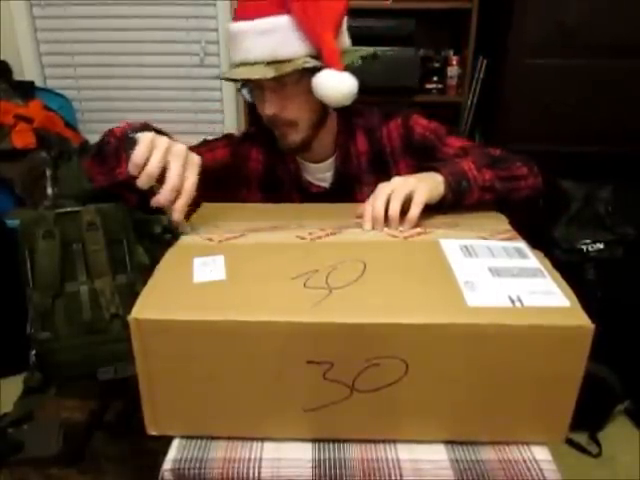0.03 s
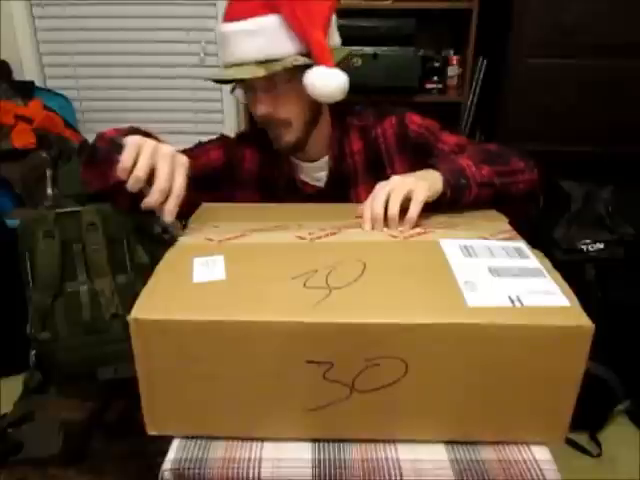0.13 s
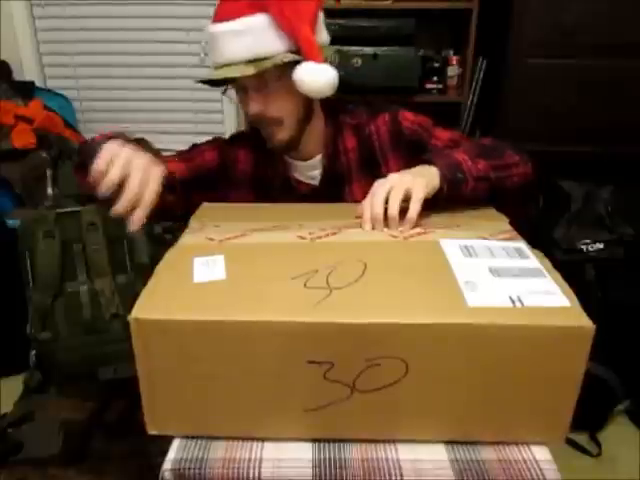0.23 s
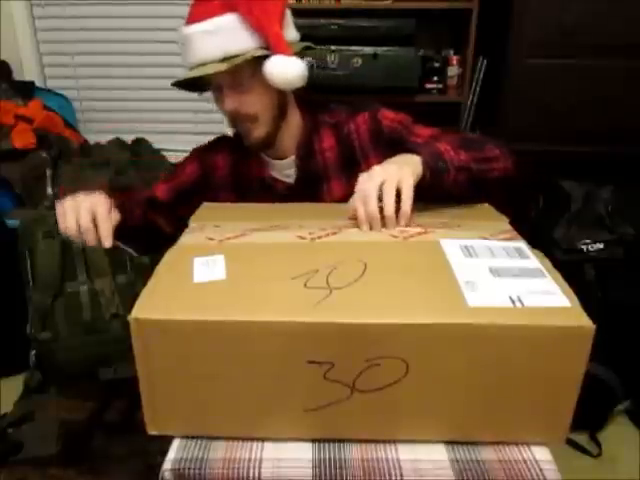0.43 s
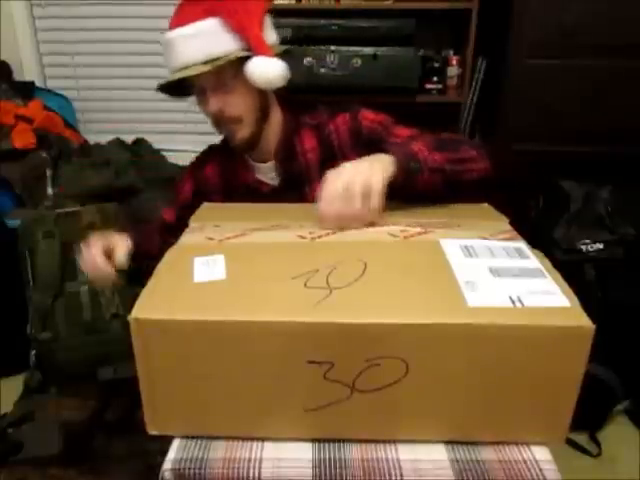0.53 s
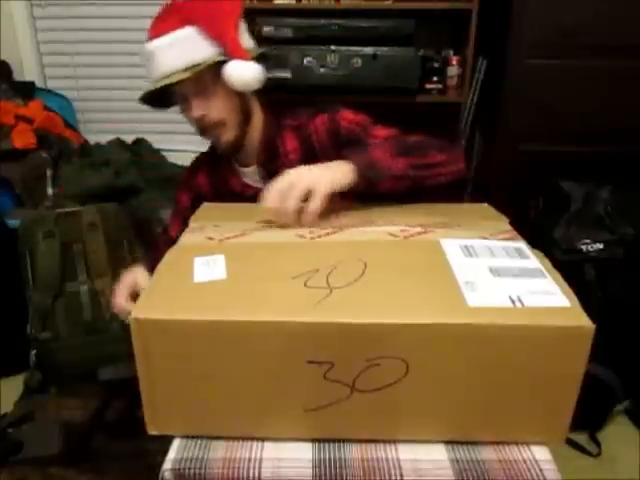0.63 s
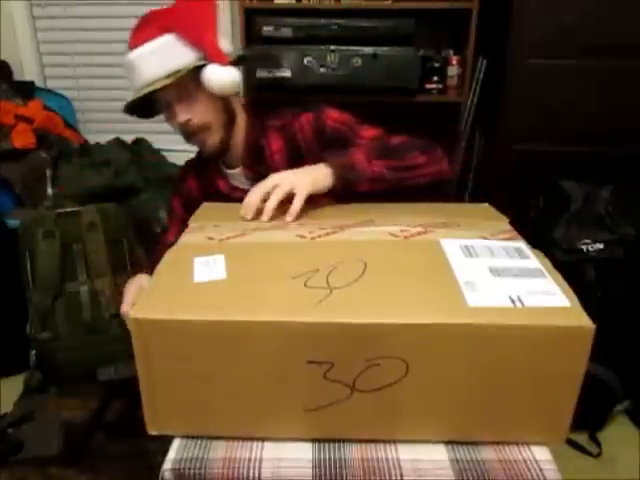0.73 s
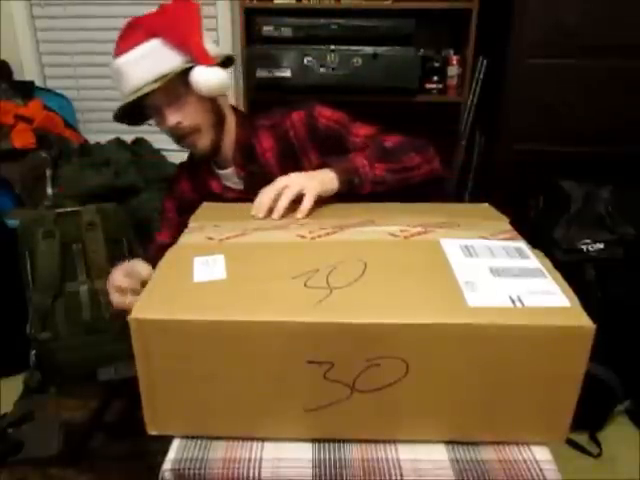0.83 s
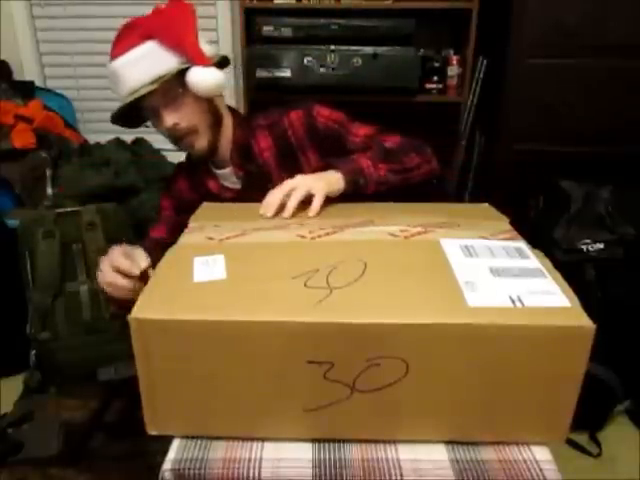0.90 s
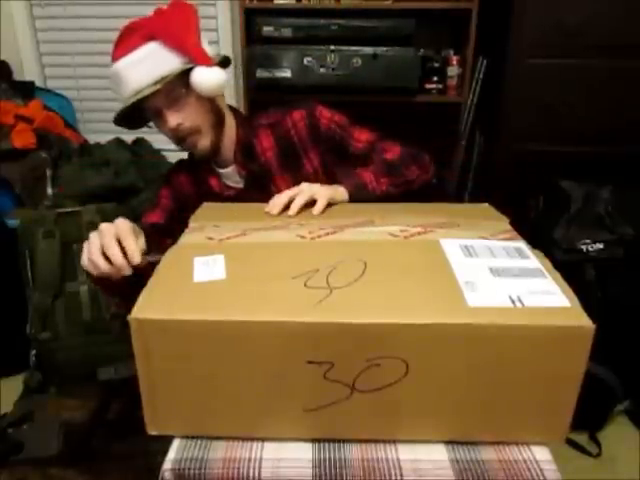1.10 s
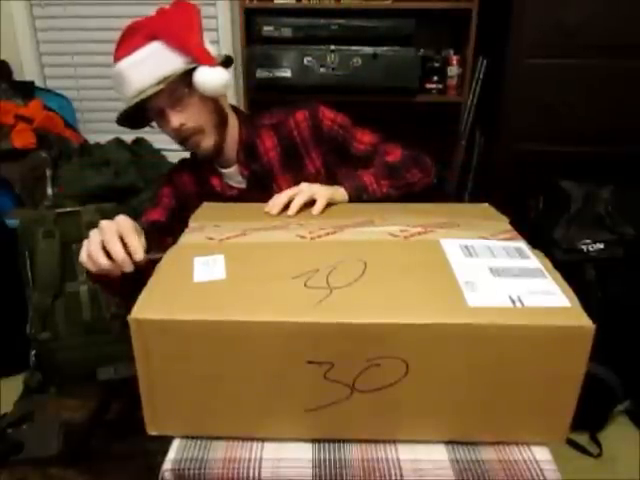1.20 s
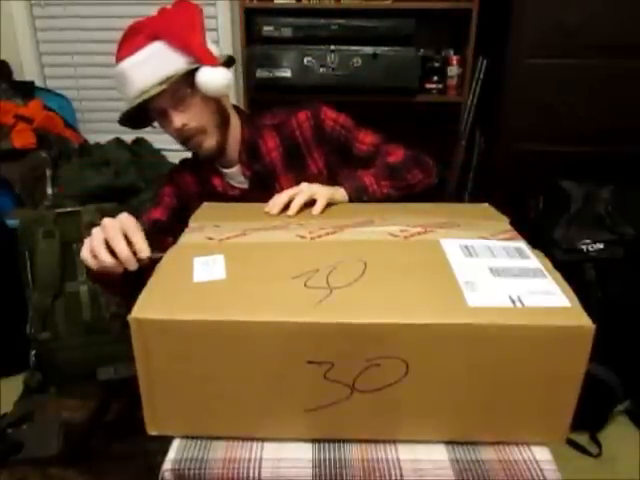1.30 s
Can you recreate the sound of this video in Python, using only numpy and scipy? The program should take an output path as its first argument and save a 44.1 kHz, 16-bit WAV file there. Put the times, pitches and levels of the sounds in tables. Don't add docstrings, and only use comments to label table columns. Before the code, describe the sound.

Packing tape being slit in quick jerks, a hollow cardboard thump, then faint taps and slides

```python
import sys
import numpy as np
from scipy import signal
from scipy.fft import rfft, irfft
from scipy.io import wavfile

SR = 44100
rng = np.random.default_rng(int(sys.argv[2]) if len(sys.argv) > 2 else 0)


def amplitude_ratio(level_db):
    exponent = np.asarray(level_db, float) / 20
    return 10 ** exponent


def log_audio(samples):
    frames = np.atleast_2d(samples).T
    limited = np.clip(frames, -1, 1)
    pcm = np.round(limited * 32767).astype(np.int16)
    wavfile.write(sys.argv[1], SR, pcm)


N = 59535

# (pitch_hz, level_db, t60_s = time to fade by 60 dB)
LID_MODES = [(102.7, -3, 0.094), (161, -10.5, 0.085), (200.3, -9.5, 0.11), (310, -3.5, 0.112),
             (347, -10, 0.15), (481.6, 3.5, 0.08), (528.5, -4.5, 0.06), (591, 1.5, 0.084),
             (648, 1.5, 0.027), (769, -4, 0.077), (822, -27, 0.13), (1004, -9, 0.12), (1109, -22, 0.12),
             (1310, -1.5, 0.024)]


def rms_one(x):
    return x / np.sqrt(np.mean(x ** 2) + 1e-20)


def colour(x, spectrum):
    hz, db = np.transpose(spectrum)
    bin_hz = np.fft.rfftfreq(N, 1 / SR)
    gain_db = np.interp(np.log(bin_hz + 1), np.log(hz), db)
    return rms_one(irfft(rfft(x) * amplitude_ratio(gain_db), N))


def grains(per_s, spread_db):
    sizes = amplitude_ratio(spread_db * np.minimum(rng.exponential(1, N), 4))
    signs = rng.choice([-1, 1], N)
    happens = rng.random(N) < per_s / SR
    return rms_one(sizes * signs * happens)


def stroke(start_s, swell_s, hold_s, fade_s):
    since = np.arange(N) / SR - start_s
    return np.interp(since, np.cumsum([0, swell_s, hold_s, fade_s]), [0, 1, 1, 0]) ** 0.84


def ring(force, hz, t60_s):
    decay = amplitude_ratio(-60 / (t60_s * SR))
    turn = 2 * np.pi * hz / SR
    return signal.lfilter([0, np.sin(turn)], [1, -2 * decay * np.cos(turn), decay ** 2], force + 1e-18)


def panel(force, modes):
    longest_s = 0.16
    return sum(amplitude_ratio(db) * ring(force, hz, min(t60_s, longest_s)) for hz, db, t60_s in modes)


def friction(clicks, spectrum, strokes, box_db, cutoff_hz):
    hiss = colour(clicks, spectrum)
    heard, shake = 0, 0
    for (*shape, db), shake_db, hz in zip(strokes, box_db, cutoff_hz):
        envelope = stroke(*shape)
        dulled = signal.lfilter(*signal.butter(1, hz, fs=SR), hiss)
        heard = heard + amplitude_ratio(db) * envelope * dulled
        shake = shake + amplitude_ratio(db + shake_db) * envelope
    return heard + panel(clicks * shake, LID_MODES) / np.std(panel(clicks, LID_MODES))


def blows(rows, modes):
    start_s, peak_db, crack_db, contact_s = np.transpose(rows)[..., None]
    since = np.arange(N) / SR - start_s
    half_sine = np.sin(np.pi * np.clip(since / contact_s, 0, 1))
    pushes = -amplitude_ratio(peak_db - 11.5) * half_sine * np.pi / (2 * contact_s * SR)
    felt = amplitude_ratio(1.5 * rng.standard_normal((len(rows), len(modes))))
    ringing = sum(panel(share @ pushes, [mode]) for share, mode in zip(felt.T, modes))

    crack_t60_s = 0.009
    fading = amplitude_ratio(crack_db - 60 * np.maximum(since, 0) / crack_t60_s) * (since > 0)
    crack = np.sum(fading, axis=0) * rng.standard_normal(N)
    band = signal.butter(3, [1700, 5600], "band", fs=SR, output="sos")
    return ringing + signal.sosfilt(band, crack)


def tape_cut():
    # (start_s, swell_s, hold_s, fade_s, tear_db)
    jerks = [
        (-.04, 0.081, 0.027, 0.034, -37.5),
        (0.081, 0.03, 0.0054, 0.053, -35.5),
        (0.166, 0.012, 0.022, 0.023, -37),
        (0.211, 0.02, 0.029, 0.013, -31),
        (0.2597, 0.0027, 0.012, 0.043, -30.5),
    ]
    box_db = [-6.5, -10.5, -5, -10, -12]
    cutoff_hz = [15700, 15200, 15000, 13200, 4630]
    # (pitch_hz, level_db per Hz)
    tear_spectrum = [(410, -11), (700, 0), (1350, -5.5), (1700, -5.5), (1950, -6), (2870, -14.5),
                     (3520, -11.5), (12500, -21), (15000, -31.5)]
    tears = grains(per_s=3500, spread_db=2)
    return friction(tears, tear_spectrum, jerks, box_db, cutoff_hz)


def blade_catches():
    # (start_s, peak_db, crack_db, contact_s)
    catches = [(.072, -40, -27.5, 0.00026), (.111, -33, -44, 0.0004), (.121, -29, -37, 0.00087),
               (.183, -28, -57, 0.00035), (.217, -23, -44, 0.00043), (.229, -20, -38, 0.00028),
               (.2598, -16, -17, 0.00079), (.2625, -2, -14.5, 0.00097), (.267, -17.5, -19.5, 0.00094),
               (.285, -18, -44, 0.00095), (.291, -17.5, -40, 0.00047)]
    return blows(catches, LID_MODES)


def hand_slides():
    # (start_s, swell_s, hold_s, fade_s, hiss_db)
    rubs = [
        (0.432, 0.07, 0.068, .05, -49.5),
        (0.527, 0.027, .004, 0.038, -46.5),
        (0.784, 0.019, 0.041, 0.063, -53),
        (0.833, 0.1, 0.019, 0.13, -50),
        (1.246, 0.011, 0.03, 0.08, -51.5),
    ]
    box_db = [-1.5, -24, -12.5, -15, -1.5]
    cutoff_hz = [3240, 6760, 15700, 15300, 7700]
    # (pitch_hz, level_db per Hz)
    rub_spectrum = [(290, -40), (500, -6), (594, -24), (657, -8), (954, -8.5), (2720, -9), (9650, -15),
                    (15500, -24.5)]
    clicks = grains(per_s=12000, spread_db=1.5)
    return friction(clicks, rub_spectrum, rubs, box_db, cutoff_hz)


def fingertip_taps():
    # (start_s, peak_db, crack_db, contact_s)
    taps = [(.498, -32, -70, 0.0013), (.525, -32, -68, 0.00061), (.537, -34, -32.5, 0.0012),
            (.552, -32, -42, 0.00047), (.563, -36, -55, 0.0005), (.587, -37, -58, 0.0011)]
    # (pitch_hz, level_db, t60_s)
    wall_modes = [(171, -23, .07), (287, -6, 0.13), (440, -9, 0.054), (449, 3.5, 0.12), (714, 2, 0.039),
                  (840, 2, 0.082), (1280, -26, .04)]
    return blows(taps, wall_modes)


def flap_knocks():
    # (start_s, peak_db, crack_db, contact_s)
    knocks = [(1.163, -36, -62, 0.00067), (1.170, -32.5, -63, 0.00029), (1.180, -35.5, -39.5, 0.00043),
              (1.210, -44.5, -64, .0005), (1.279, -37, -50, 0.0013)]
    # (pitch_hz, level_db, t60_s)
    flap_modes = [(132, -26, 0.13), (202, 7.5, 0.05), (253, 6, .12), (489, 0, 0.27), (563, 1.5, 0.19),
                  (625, 10, 0.13), (704, 11, 0.033), (870, 4, 0.05), (1028, 5, 0.052), (1070, -5, 0.05),
                  (1550, 3, 0.035), (1820, 2.5, 0.092), (1900, -15, 0.038), (2320, -4.5, 0.038)]
    return blows(knocks, flap_modes)


def squeaks():
    # (start_s, length_s, pitch_hz, level_db)
    moments = [(0.099, 0.012, 3525, -38), (0.11, .05, 98, -66), (0.205, 0.059, 3350, -36.5),
               (0.264, 0.022, 1730, -32), (0.77, 0.046, 74.4, -54), (0.65, 0.088, 460, -52),
               (1.194, 0.0058, 1400, -48), (1.253, 0.025, 1900, -41.5), (1.287, 0.0275, 160, -43.5)]
    t = np.arange(N) / SR
    white = rng.standard_normal(N)
    out = 0
    for start_s, length_s, hz, db in moments:
        tone = rms_one(ring(white, hz, min(0.07, 50 / hz)))
        wobble = np.abs(signal.hilbert(tone))
        tone = tone / (wobble + 0.3) ** 0.6
        out = out + amplitude_ratio(db) * tone * np.sin(np.pi * np.clip((t - start_s) / length_s, 0, 1))
    return out


def room(x):
    t60_s, first_echo_s, level_db = 0.25, 0.004, -9.5
    t = np.arange(SR // 2) / SR
    tail = rng.standard_normal(len(t)) * amplitude_ratio(-60 * t / t60_s) * (t > first_echo_s)
    tail = signal.lfilter(*signal.butter(1, 10900, fs=SR), tail)
    tail = tail / np.sqrt(np.sum(tail ** 2))
    return amplitude_ratio(level_db) * signal.fftconvolve(x, tail)[:N]


def background():
    # (pitch_hz, level_db per Hz)
    hum_spectrum = [(15, -52), (25, -15.5), (186, -11.5), (354, -10.5), (404, -9), (790, -13),
                    (1090, -14.5), (1210, -16.5), (15000, -34.5)]
    # (pitch_hz, rms level_db)
    whine_tone = [(11822, -76)]
    (hz, db), = whine_tone
    hum = amplitude_ratio(-54) * colour(rng.standard_normal(N), hum_spectrum)
    whine = amplitude_ratio(db + 2.5) * np.sin(2 * np.pi * hz * np.arange(N) / SR)
    return hum + whine


def scene():
    box = tape_cut() + blade_catches() + hand_slides() + fingertip_taps() + flap_knocks() + squeaks()
    no_bass = signal.butter(4, 110, "high", fs=SR, output="sos")
    box = signal.sosfilt(no_bass, box)
    return (box + room(box) + background())[None]


def band_limit(x):
    return signal.sosfilt(signal.butter(12, 15940, fs=SR, output="sos"), x)


def record(dry):
    heard = signal.lfilter(*signal.iirnotch(7830, 52, SR), dry)
    top_cut = signal.cheby2(16, 70, 16050, fs=SR, output="sos")
    return band_limit(signal.sosfilt(top_cut, heard))


dry = scene()
out = record(dry)
log_audio(out)
```